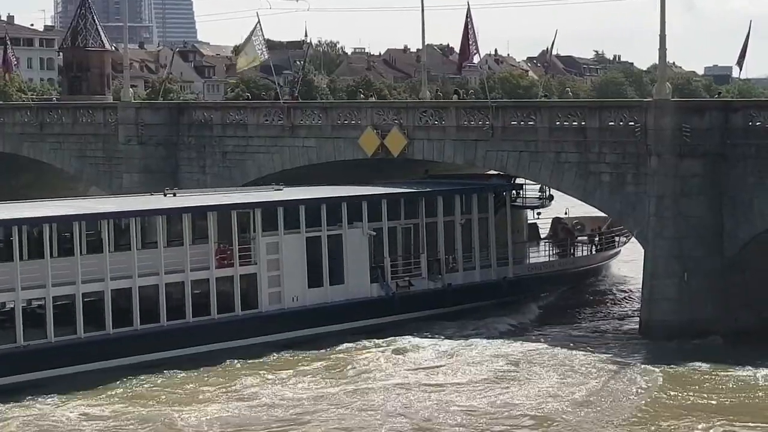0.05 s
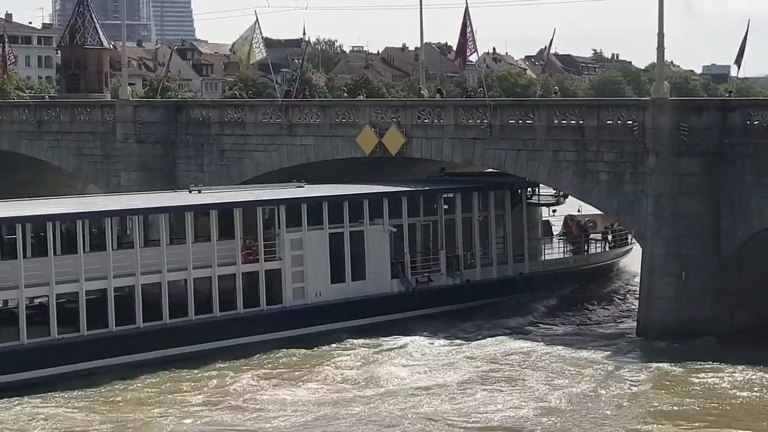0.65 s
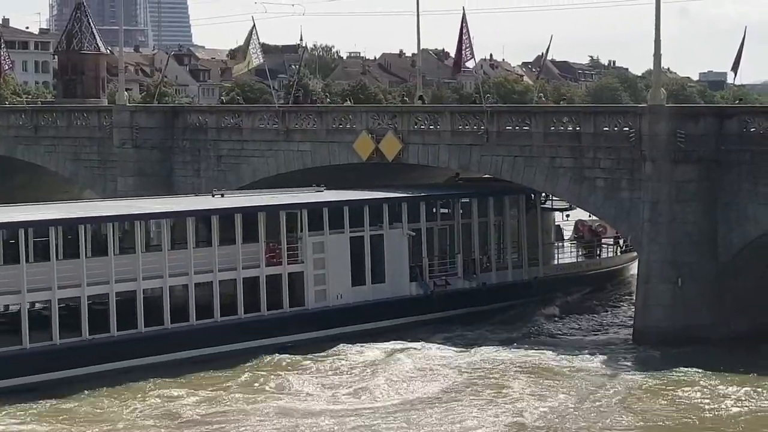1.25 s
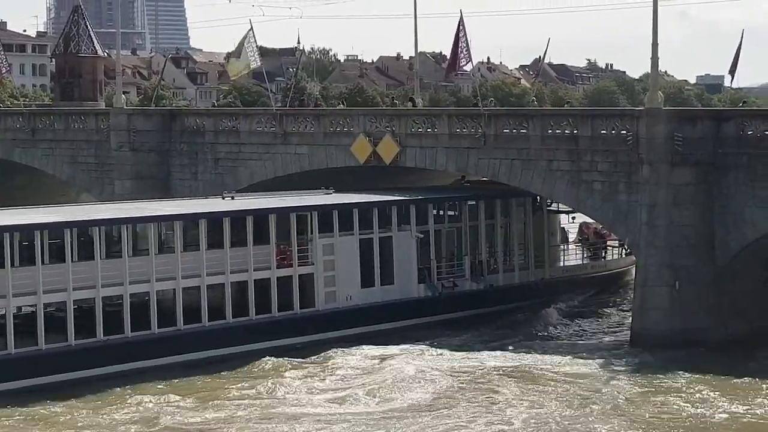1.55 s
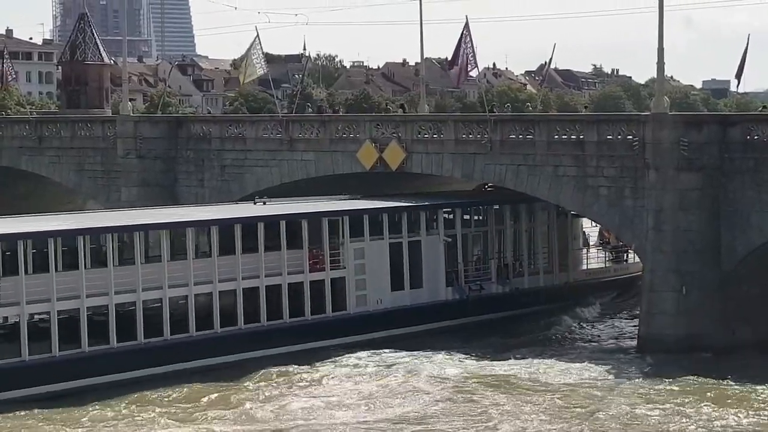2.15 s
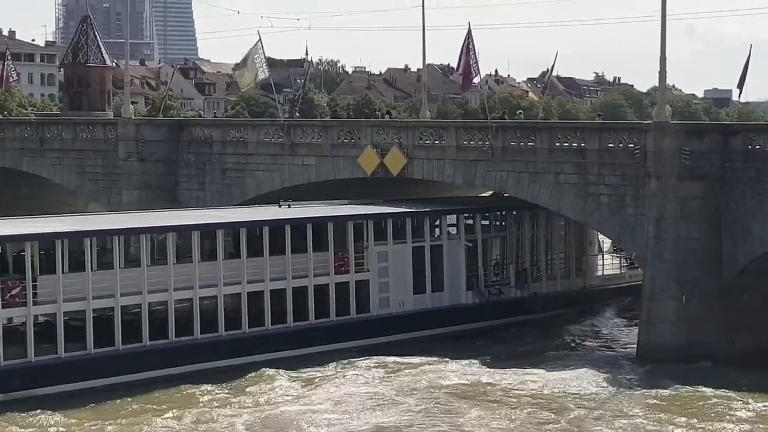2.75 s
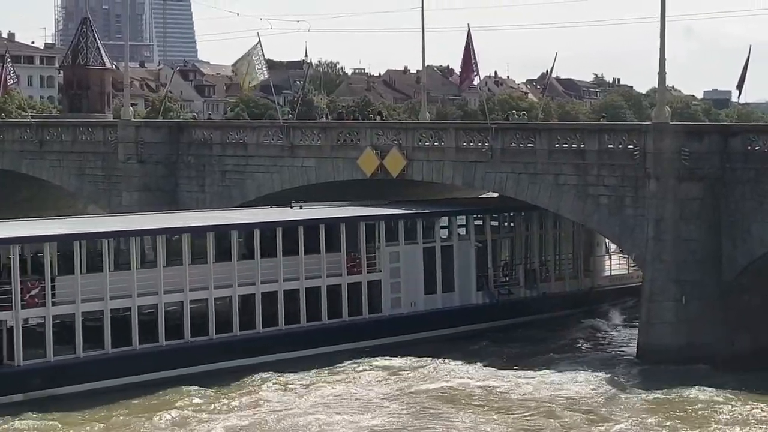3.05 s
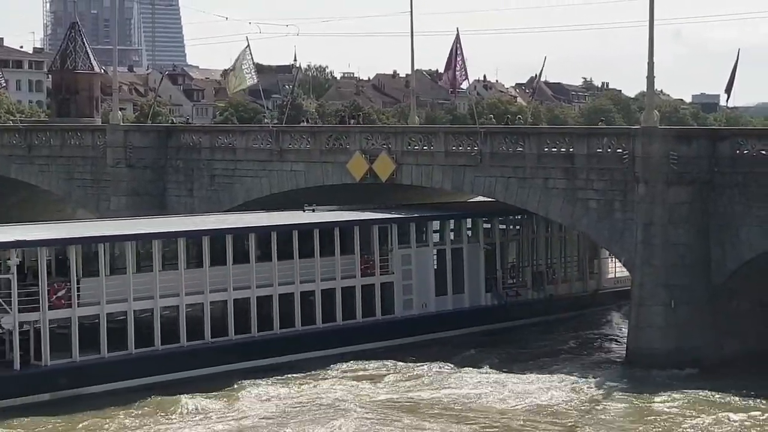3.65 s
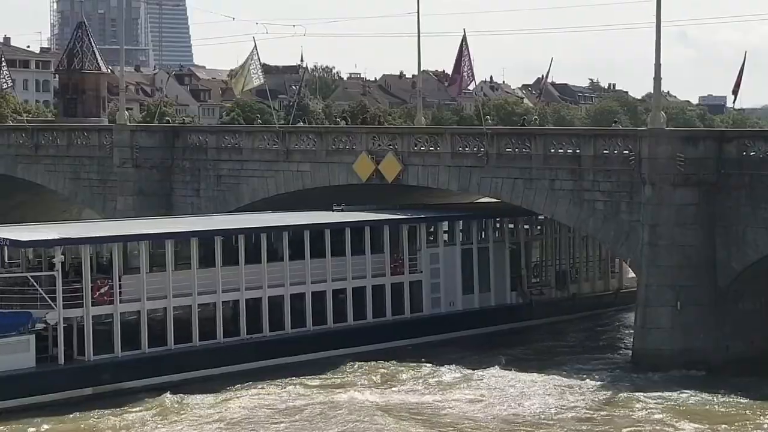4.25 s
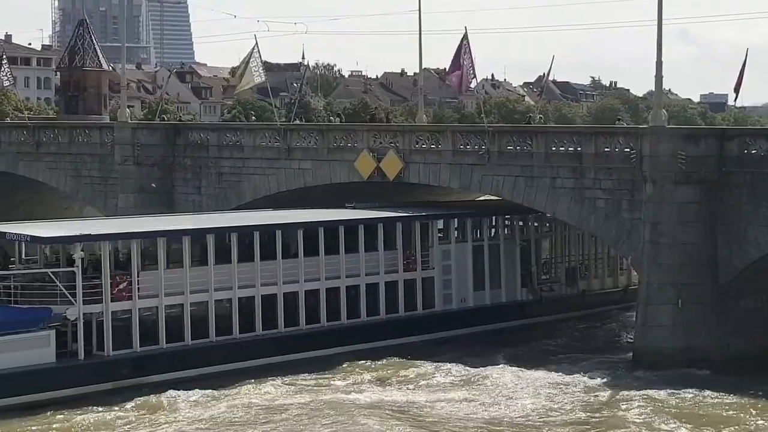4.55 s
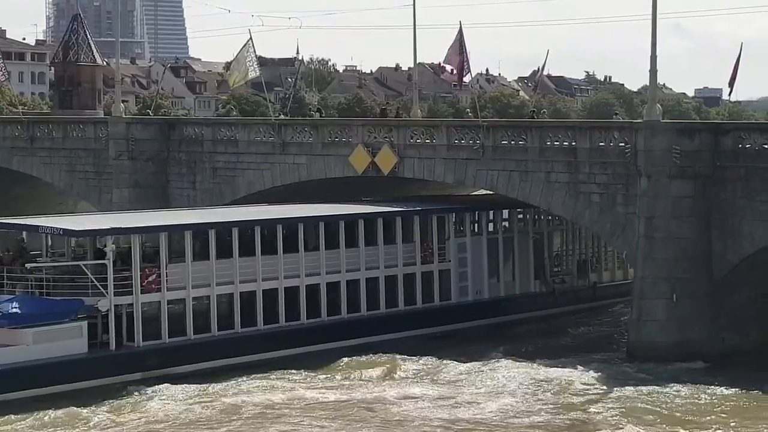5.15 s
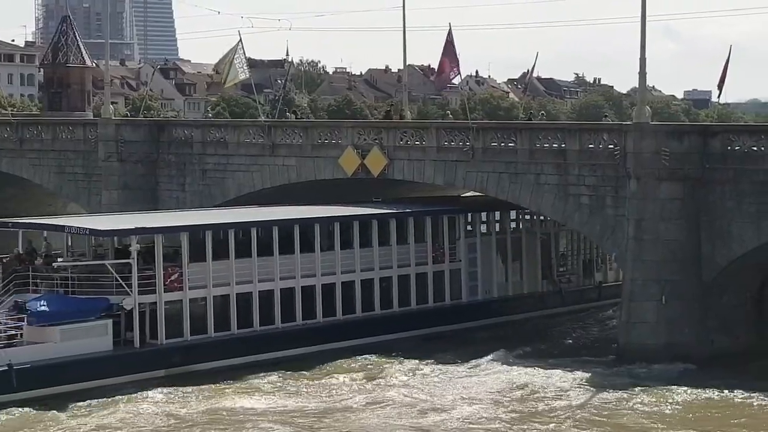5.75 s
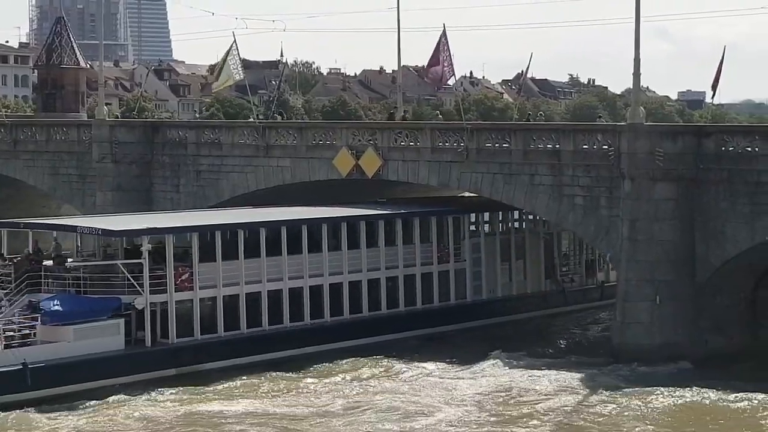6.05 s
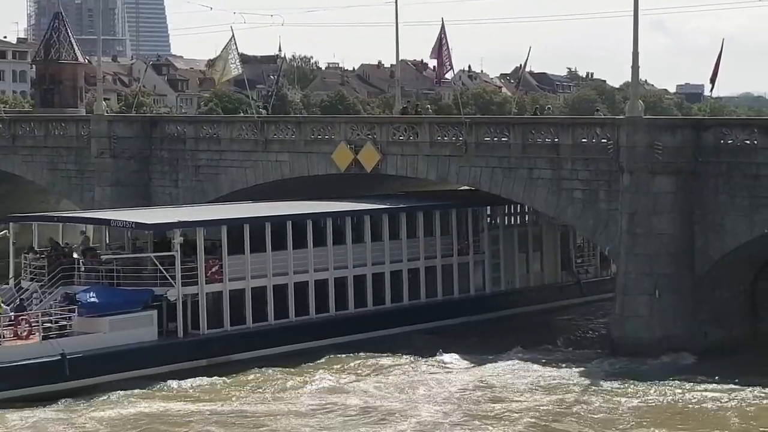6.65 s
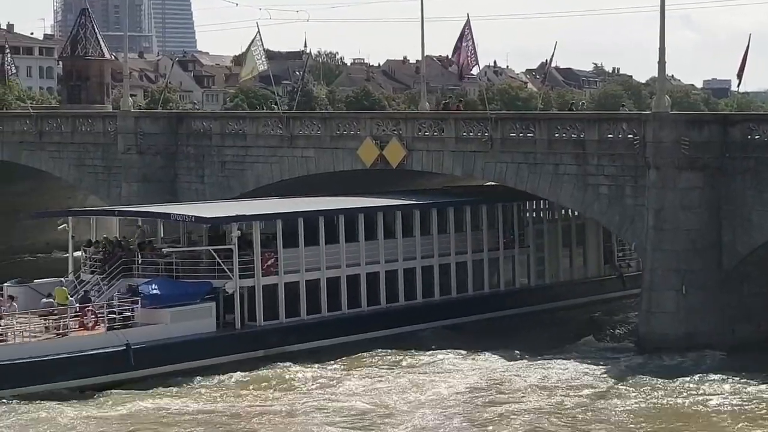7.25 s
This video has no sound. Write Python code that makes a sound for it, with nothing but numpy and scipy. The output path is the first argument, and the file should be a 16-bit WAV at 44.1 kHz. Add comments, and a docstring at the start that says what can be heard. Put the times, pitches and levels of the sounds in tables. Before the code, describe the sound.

Deep, throbbing engine rumble and the steady rush of white water run together from start to finish as a river ship moves under a stone bridge. From the bank, the drone grows a little toward the middle, then eases slightly. Small drops and bubbles fleck the water noise. Early on there are faint far-off squeaks and a brief hollow note from the exhaust, while a faint high whistle sinks slightly in pitch.

```python
"""A passenger ship's engines drone as it pushes up a fast river and under a stone bridge.
Two main diesels and two generators run slightly out of step, so their drone throbs and swells.
Swirling exhaust adds a dull roar, a turbocharger whistles thinly, and the bubbles of white water
rush and ping. Faint squeaks come from far along the bank, and the exhaust pipes give a hollow
note as they point at the listener."""
import sys
import numpy as np
from scipy import signal
from scipy.fft import rfft, irfft
from scipy.io import wavfile
from scipy.ndimage import uniform_filter1d

SR = 44100
rng = np.random.default_rng(int(sys.argv[2]) if len(sys.argv) > 2 else 0)


def dump(signal):
    """Clip the signal to [-1, 1] and save it as 16-bit WAV at the path in sys.argv[1]."""
    limited = np.clip(np.atleast_2d(signal).T, -1, 1)
    pcm = np.round(limited * 32767).astype(np.int16)
    wavfile.write(sys.argv[1], SR, pcm)


N = 326340
TIME = np.arange(N) / SR


def gain_of(db):
    """Turns decibels into a number to multiply a sound by."""
    return 10 ** (np.asarray(db) / 20)


def evened(x):
    """Scales a signal so that its average strength (rms) is 1."""
    return x / np.sqrt(np.mean(x ** 2) + 1e-20)


def level_at(points, hz):
    """Joins the points of a (frequency, level) table along a logarithmic frequency axis."""
    point_hz, db = np.transpose(points)
    return np.interp(np.log(hz + 1), np.log(point_hz + 1), db)


def wander(rate_hz):
    """A random wobble (complex numbers, strength 1), no faster than about the given rate."""
    hz = np.fft.fftfreq(N, 1 / SR)
    noise = rng.standard_normal(N) + 1j * rng.standard_normal(N)
    return evened(np.fft.ifft(noise * np.exp(-.5 * (hz / rate_hz) ** 2)))


def facing(at_s, width_s):
    """1 when a moving source points at the listener, falling toward 0 long before and after."""
    return 1 / (1 + ((TIME - at_s) / width_s) ** 2)


def hidden(clear_s=1.64):
    """How much the back of the ship is still hidden: from 1 down to 0."""
    return np.maximum(1 - TIME / clear_s, 0)


def engine_pair(engines, in_step_s, roughness):
    """Two engines at nearly the same speed: their tones take turns adding up and cancelling."""
    pipe_phase, out = rng.random(64), np.zeros(N)
    for shaft_hz, level_db, tones in engines:
        turns = np.cumsum(shaft_hz * np.ones(N)) / SR
        turns -= np.interp(in_step_s, TIME, turns)  # at this moment both fire together
        for multiple, db in tones:
            per_cycle = round(2 * multiple)  # a four-stroke cycle takes two turns
            uneven = 1 + roughness * wander(rate_hz=3.65)  # no two firings are alike
            tone = uneven * np.exp(2j * np.pi * (per_cycle * turns / 2 + pipe_phase[per_cycle]))
            out += np.sqrt(2) * gain_of(level_db + db) * tone.real
    return out * gain_of([[1.5], [-1.7]])  # left, right


# Tones of six cylinders firing three times a turn: (pitch [times shaft speed], relative level [dB])
DIESEL_TONES = [(3, -33), (4, -31), (5, -38), (6, 1.5), (7, -16.5), (9, -8.5), (12, -12.5), (18, -28.5),
                (24, -26)]

def diesels(port_hz=12.788, starboard_hz=12.84, creep_hz_per_s=.0066, turned_away_db=-4):
    """The main engines swell about every two seconds, ever sooner as one shaft creeps up in speed."""
    # loudest while the exhaust pipes face the bank
    level_db = -33 + turned_away_db * (1 - facing(at_s=4.14, width_s=1.75))
    port = (port_hz, level_db, DIESEL_TONES)
    starboard = (starboard_hz + creep_hz_per_s * TIME, level_db, DIESEL_TONES)
    return engine_pair([port, starboard], in_step_s=3.2, roughness=0.13)


# Tones of the faster and the slower generator: (pitch [times shaft speed], relative level [dB])
FAST_TONES = [(2, -18.5), (3, -6.5), (3.5, -23), (4, 1), (5, -15), (6, -15), (8.5, -17)]
SLOW_TONES = [(2, -16), (3, -5), (4, 2), (5, -21.5), (6, -13), (8.5, -28)]
# The slower generator's drifting speed: (time [s], shaft speed [turns per second])
SLOW_SPEED = [(0, 24.24), (2.8, 24.22), (4.2, 24.31), (5.7, 24.06), (6.6, 24.25)]

def generators(fast_hz=25.02, hidden_db=-7):
    """One generator holds its speed, the other drifts just below: they throb three times a second."""
    drop_db = hidden_db * hidden()
    slow_hz = np.interp(TIME, *np.transpose(SLOW_SPEED))
    fast = (fast_hz, -29.5 + drop_db, FAST_TONES)
    slow = (slow_hz, -33 + drop_db, SLOW_TONES)
    return engine_pair([fast, slow], in_step_s=2.876, roughness=0.06)


# Tone colour of the exhaust and propeller roar: (frequency [Hz], relative level [dB])
ROAR_COLOUR = [(15, -18.5), (28, -18), (44, -5), (55, 0), (85, -8), (108, -1), (135, -6.5), (170, -7.5),
               (240, -8.5), (320, -10.5), (420, -15.5), (640, -10.5), (900, -20), (1500, -43), (4000, -56)]

def exhaust_roar(level_db=-34.5, hidden_db=-2, spread_hz=1500, bass_spread=0.034):
    """Swirling exhaust gas makes noise: nearly the same in both ears in the bass, wider higher up."""
    hz = np.fft.rfftfreq(N, 1 / SR)
    middle, side = rfft(rng.standard_normal((2, N))) * gain_of(level_at(ROAR_COLOUR, hz))
    side *= np.minimum(bass_spread + hz / spread_hz, 1)
    roar = evened(irfft(np.array([middle + side, middle - side]), N))
    return roar * gain_of(level_db + hidden_db * hidden()) * gain_of([[1.2], [-1.4]])


# Tone colour of the white water in each ear: (frequency [Hz], relative level [dB])
LEFT_COLOUR = [(100, -10), (350, -6.5), (600, -5.5), (1050, -1), (1900, -3.5), (2550, -6), (2900, -13),
               (4400, -11), (5600, -15.5), (8300, -20), (9600, -20.5), (12800, -29), (14500, -38)]
RIGHT_COLOUR = [(100, -19), (350, -15), (600, -10), (1050, -5.5), (1900, -6.5), (2500, -13), (3500, -14.5),
                (6300, -18.5), (7900, -19.5), (8800, -29), (10100, -20.5), (12000, -23), (13200, -25.5),
                (14500, -30)]
# Louder bands in the rush between bank and bridge:
# (frequency [Hz], width [Hz], left boost [dB], right boost [dB])
WATER_BANDS = [(605, 107, 2, 1), (1385, 175, 4.5, 3), (1944, 165, 4.5, 2.5)]

def white_water(churn_db=-38.5, foam_db=-44, flicker_db=0.74, swell_db=0.31):
    """Countless bubbles merge into a rush that flickers in patches as waves fold over."""
    frames = dict(nperseg=1024, noverlap=768)
    hz, _, spectrum = signal.stft(rng.standard_normal((2, N)), SR, **frames)
    colour_db = np.array([level_at(LEFT_COLOUR, hz), level_at(RIGHT_COLOUR, hz)])
    for centre_hz, width_hz, left_db, right_db in WATER_BANDS:
        hump = np.exp(-.5 * (1.52 * (hz - centre_hz) / width_hz) ** 2)
        colour_db += np.outer([left_db, right_db], hump)
    patches = uniform_filter1d(rng.standard_normal(spectrum.shape), size=14, axis=1)  # smooth in pitch
    patches = evened(uniform_filter1d(patches, size=12, axis=2))  # and in time
    spectrum *= gain_of(colour_db[:, :, None] + flicker_db * patches)
    foam_share = 1 / (1 + (2800 / (hz[:, None] + 1)) ** 6)  # the smallest bubbles make the hiss
    churn = evened(signal.istft(spectrum * (1 - foam_share), **frames)[1][:, :N])
    foam = evened(signal.istft(spectrum * foam_share, **frames)[1][:, :N])
    water = churn * gain_of(churn_db) + foam * gain_of(foam_db)
    return water * gain_of(swell_db * wander(rate_hz=2.6).real)


def splashes(level_db=-56, per_s=420, fade_cycles=5, spread_db=5.0, pitches=24):
    """Nearer drops and bursting bubbles make short, slightly rising pings of very unequal size."""
    out = np.zeros((2, N))
    for hz in np.geomspace(900, 12000, pitches):
        cycles = np.arange(2048) * hz / SR
        rise = 1 + 0.0087 * np.tanh(cycles / fade_cycles)
        ping = np.exp(-cycles / fade_cycles) * np.sin(2 * np.pi * cycles * rise)
        size = gain_of(spread_db * np.minimum(rng.exponential(1, (2, N)), 5))
        bursts = size * (rng.random((2, N)) < per_s / pitches / SR)
        out += signal.oaconvolve(bursts, ping[None], axes=1)[:, :N] * (hz / 900) ** -.15
    return gain_of(level_db) * evened(out)


# The whistle and its octave, each sent out in a beam: (pitch [times whistle pitch], level [dB],
# loudest at [s], beam half-width [s], left boost [dB], right boost [dB])
WHISTLE_TONES = [(1, -58, 2.95, 1.8, 6.5, 0.5), (2, -63, 2.2, 1.5, 0, 3.5)]

def turbocharger(centre_hz=3888, fall_hz=34, passing_s=3.7, fall_s=1.0, off_beam_db=-12.5):
    """Spinning blades whistle, and the pitch sinks as the ship goes by."""
    hz = centre_hz - fall_hz / 2 * np.tanh((TIME - passing_s) / fall_s)
    cycles, out = np.cumsum(hz) / SR, np.zeros((2, N))
    for multiple, db, at_s, width_s, left_db, right_db in WHISTLE_TONES:
        tone = np.exp(2j * np.pi * multiple * cycles)
        # each ear gets a steady core plus a blur from water and stone
        paths = np.array([.6 * np.exp(2j * np.pi * rng.random()) + wander(20) for ear in range(2)])
        beam_db = db + off_beam_db * (1 - facing(at_s, width_s))
        out += evened((paths * tone).real) * gain_of(beam_db) * gain_of([[left_db], [right_db]])
    return out


# Faint squeaks and hoots: (time [s], length [s], pitch [Hz], level [dB])
FAR_SQUEAKS = [(.36, 0.44, 3540, -68), (0.374, 0.19, 2650, -61.5), (0.427, 0.14, 927, -57.5),
               (1.151, .1, 1930, -54), (1.198, 0.1, 3100, -62.5), (2.31, 0.23, 451, -51.5),
               (2.487, 0.39, 368, -54), (2.758, 0.15, 827, -53.5)]

def squeaks(blur_hz=16):
    """Brief thin tones from far along the bank, blurred by echoes."""
    out = np.zeros((2, N))
    blur = np.array([wander(blur_hz), wander(blur_hz)])
    for start_s, length_s, hz, db in FAR_SQUEAKS:
        swell = np.sin(np.pi * np.clip((TIME - start_s) / length_s, 0, 1))
        tone = (blur * np.exp(2j * np.pi * hz * TIME)).real
        out += np.sqrt(2) * gain_of(db) * swell * tone
    return out


def hollow_pipes(pitch_hz=262, blur_hz=32, level_db=-43):
    """The exhaust pipes' hollow note stands out briefly while they point at the bank."""
    note = evened((wander(blur_hz) * np.exp(2j * np.pi * pitch_hz * TIME)).real)
    return note * gain_of(level_db) * facing(at_s=1.92, width_s=0.36) * gain_of([[1.2], [-1.4]])


def scene():
    """Ship and river, heard from the bank."""
    rumble = diesels() + generators() + exhaust_roar()
    return rumble + white_water() + splashes() + turbocharger() + squeaks() + hollow_pipes()


def record(dry, cutoff_hz=14550):
    """Cuts away the very highest treble."""
    low_pass = signal.firwin(767, cutoff_hz, window=("kaiser", 9), fs=SR)
    return signal.oaconvolve(dry, low_pass[None], "same")


dry = scene()
out = record(dry)
dump(out)
```